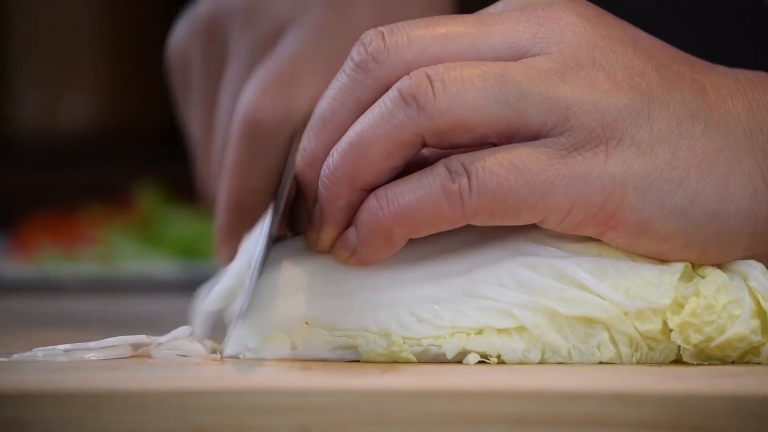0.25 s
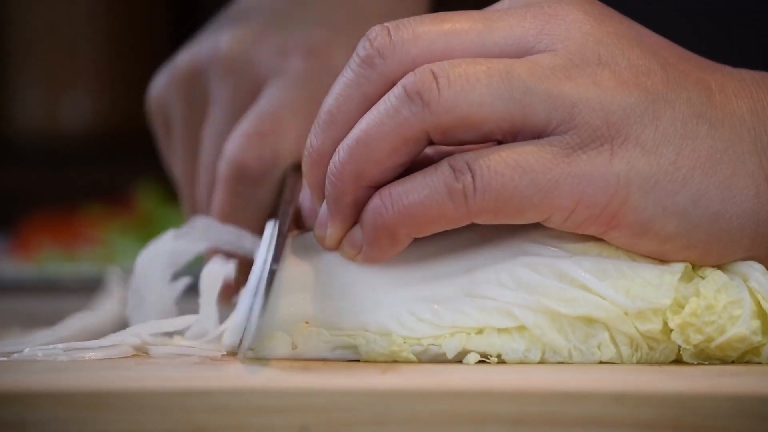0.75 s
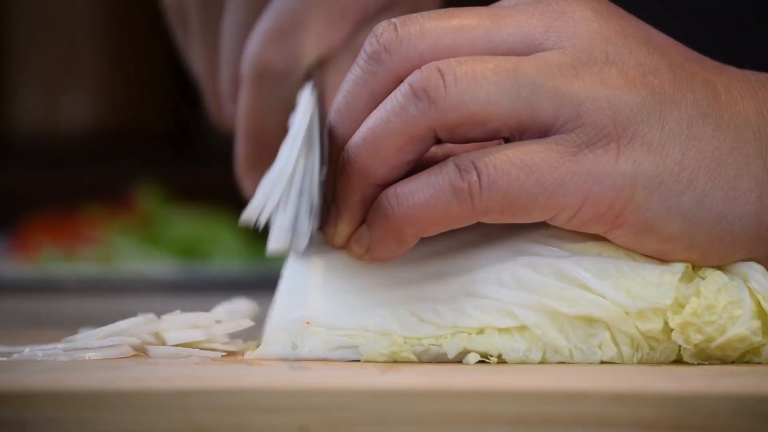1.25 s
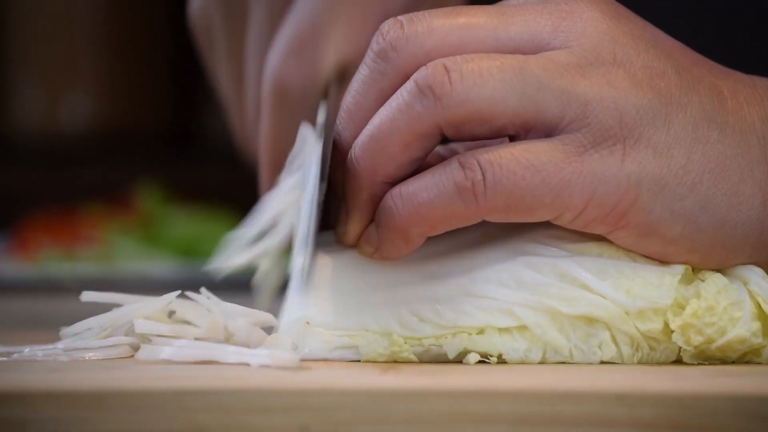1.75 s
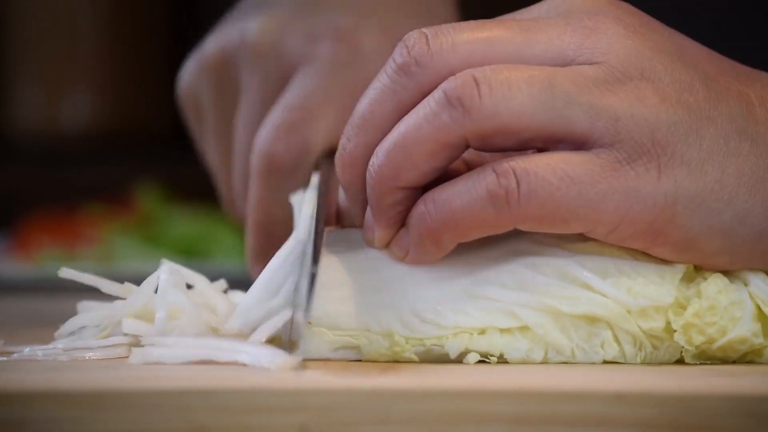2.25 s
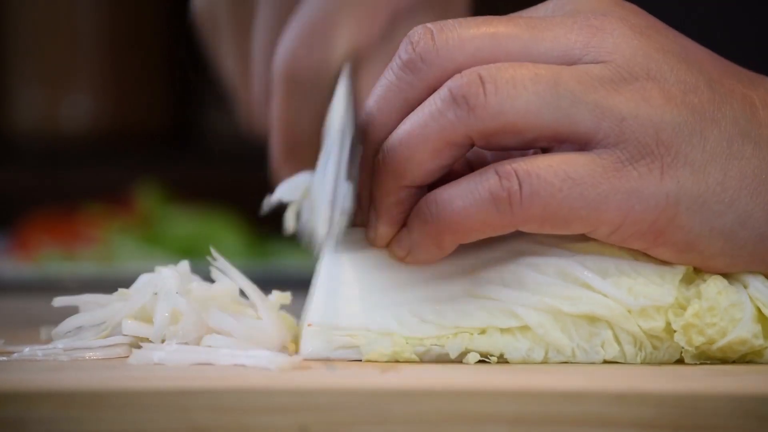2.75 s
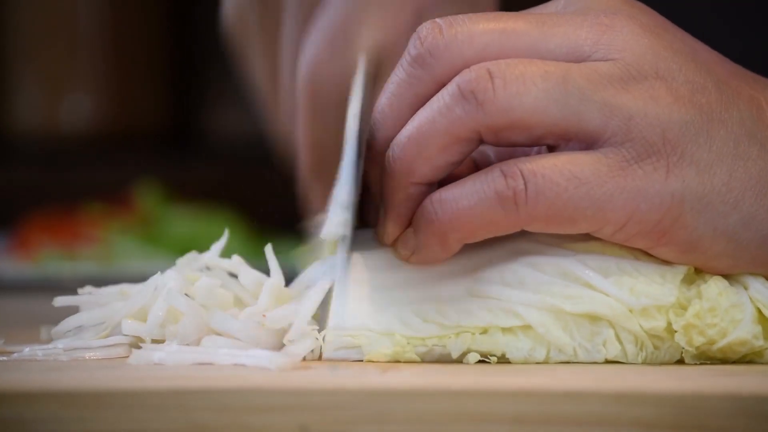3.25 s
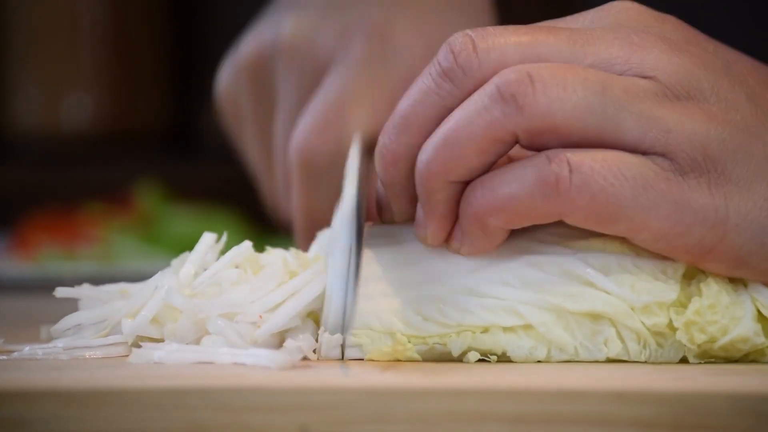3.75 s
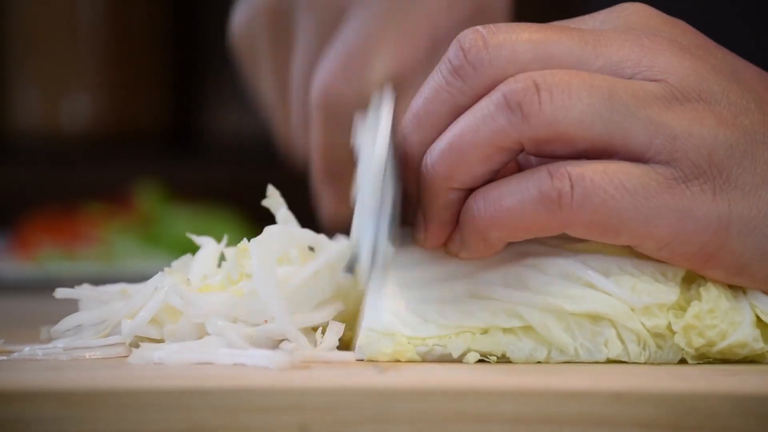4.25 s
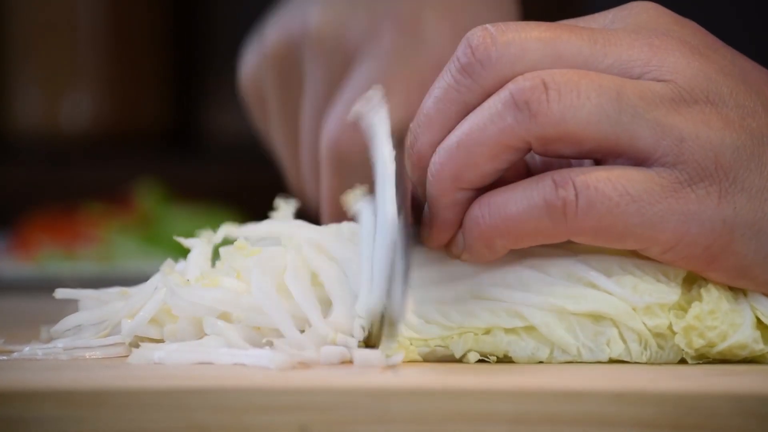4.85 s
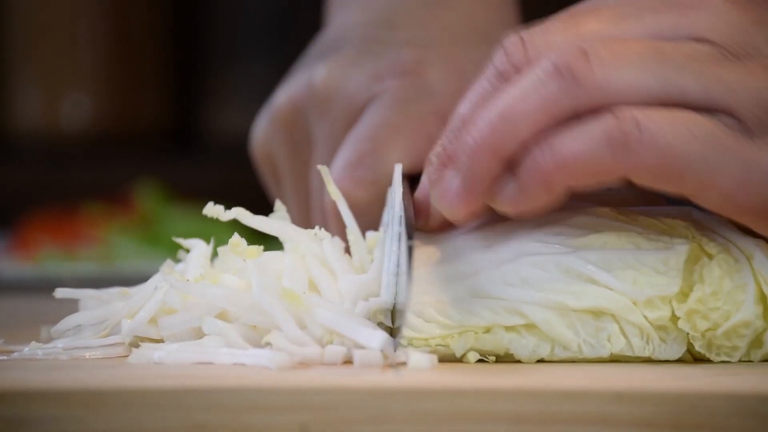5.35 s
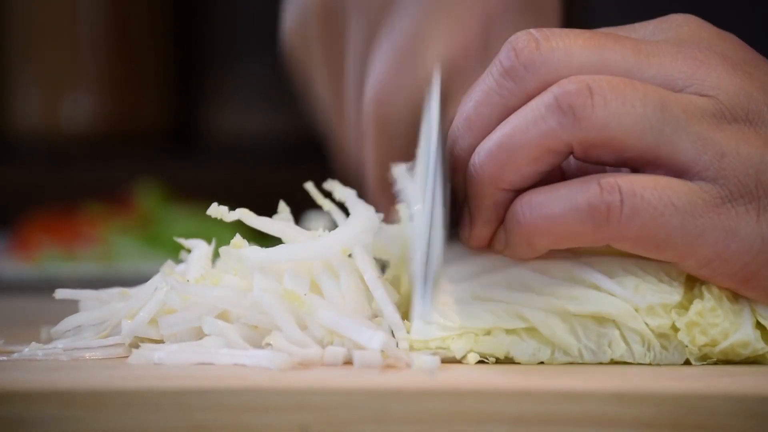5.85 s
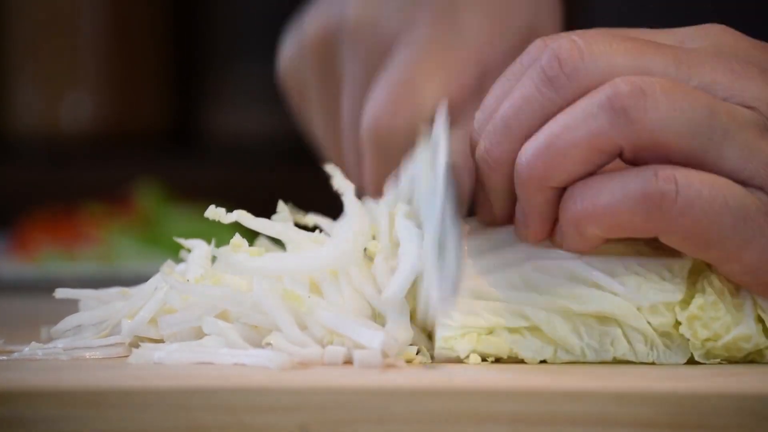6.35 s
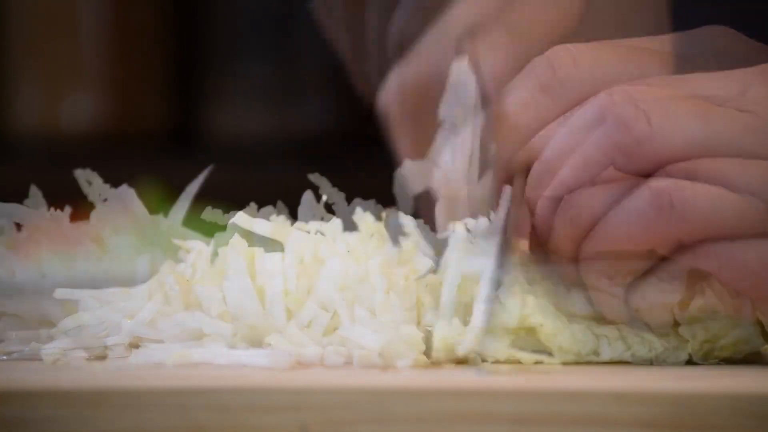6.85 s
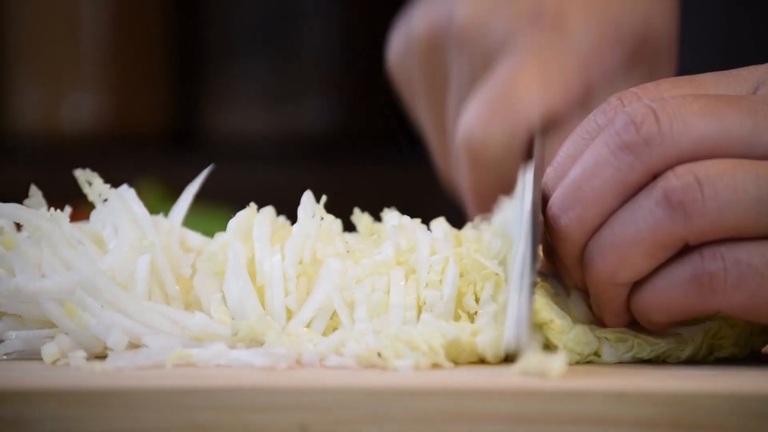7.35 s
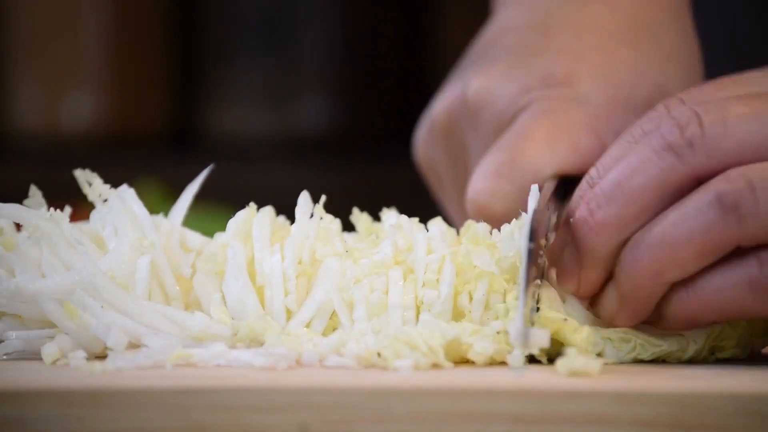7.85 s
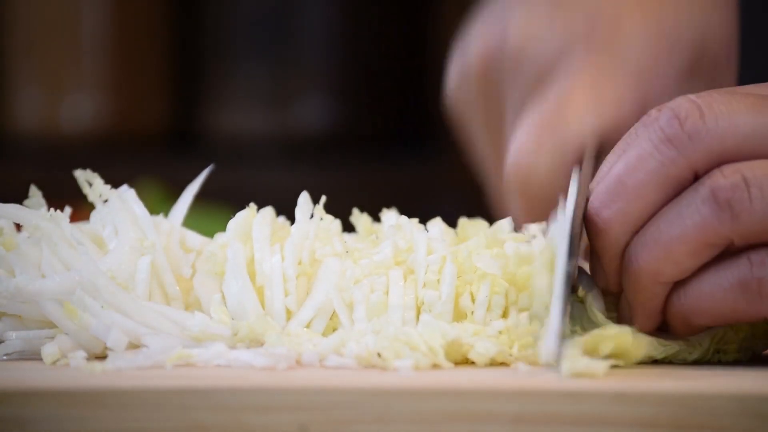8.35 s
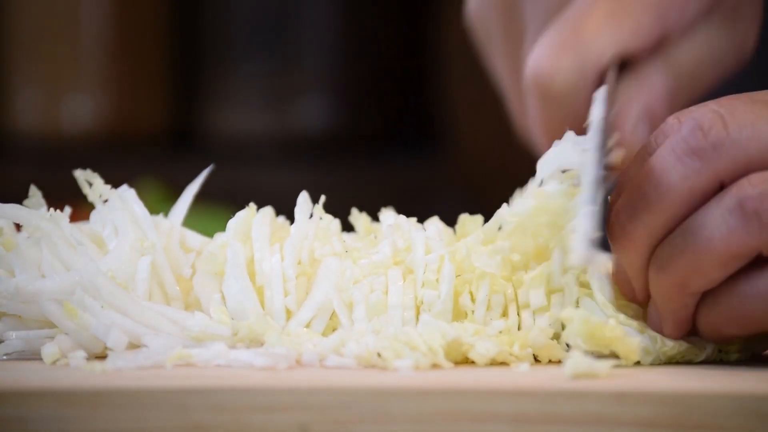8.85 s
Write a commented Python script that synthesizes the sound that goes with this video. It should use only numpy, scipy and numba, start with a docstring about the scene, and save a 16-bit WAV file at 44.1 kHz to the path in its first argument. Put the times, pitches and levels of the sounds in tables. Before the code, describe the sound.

A knife chops cabbage in a quiet kitchen, miked closely. Uneven blows give a short woody knock, a deep counter thump and a small edge crack. Leaves rasp and crunch around each stroke, ribs snap brightly and wet pockets pop. After a pause, a loud flat slap lands, then light cuts, a burst of crackles, and renewed chopping.

```python
"""A chef's knife shreds cabbage on a wooden board, close by, in a quiet kitchen.
Each blow rings decaying modes of the board and counter and cracks at the edge; once the blade slaps down flat.
Leaves crunch as dense random grains through resonances, ribs snap as noise clicks, wet pockets pop as glides.
Room noise and a faint tail lie beneath. One passage repeats, with a short fade-in where it starts over."""
import sys
import numpy as np
from scipy import signal
from scipy.fft import rfft, irfft
from scipy.io import wavfile
from scipy.ndimage import uniform_filter1d
from numba import njit

SR = 44100
rng = np.random.default_rng(int(sys.argv[2]) if len(sys.argv) > 2 else 0)


def dump_mix(stems):
    """Bounce the given channels to the path in sys.argv[1] as a 16-bit WAV at rate SR."""
    frames = np.atleast_2d(stems).T  # one column per channel
    limited = np.clip(frames, -1, 1)  # hard clip at full scale
    pcm = np.round(limited * 32767).astype(np.int16)
    wavfile.write(sys.argv[1], SR, pcm)


N = 401751

PERIOD = 262903  # samples in one passage
RESTART_S, FADE_S = 4.811, .04  # time at which the passage starts over, and the time scale of its fade-in

# Blade meets board. Each row: time in seconds, board peak in dB, counter thump peak in dB,
# edge crack peak in dB, crunch of the last leaves in dB (before CRACKLE_DB and the leaf levels).
BLOWS = [(0.14, -31.5, -19.5, -27, -63.5), (0.188, -21.5, -20, -31.5, -38.5),
         (0.361, -8, -17.5, -28, -54.5), (0.562, -10.5, -12.5, -16, -32.5),
         (0.726, -22, -19.5, -22.5, -38.5), (0.917, -13, -12, -22, -34), (1.083, -20, -15.5, -24.5, -43.5),
         (1.259, -29, -17, -29.5, -44.5), (1.318, -36.5, -21, -39, -55.5), (1.454, -7, -12, -18, -42.5),
         (1.634, -19, -13, -21.5, -37), (2.208, -13.5, -14, -28, -48), (2.409, -10.5, -16, -18, -37.5),
         (2.605, -14.5, -15, -21, -32.5), (2.805, -28, -22, -45.5, -61.5), (2.96, -18.5, -16, -22.5, -49),
         (3.047, -33, -25.5, -35, -58), (3.177, -10.5, -15, -17.5, -44.5), (3.913, -33, -22, -48, -60.5),
         (4.149, -47.5, -25.5, -46.5, -60), (4.245, -32.5, -28.5, -41.5, -61),
         (4.276, -29.5, -47, -37, -57), (5.021, -26, -20.5, -33.5, -48), (5.24, -16.5, -19, -26, -48),
         (5.706, -13.5, -13, -26.5, -35.5), (5.93, -20, -21, -29.5, -42)]
# The blade drags through leaves away from the board. Each row: middle in seconds, crackle in dB (before
# CRACKLE_DB and the leaf levels), rub in dB, length within 10 dB in seconds (its sign has no effect).
DRAGS = [(0.097, -52.5, -63, 0.2), (.314, -39.5, -46, .032), (0.486, -45.5, -57, -0.03),
         (.845, -38.5, -53, -0.0128), (1.025, -48.5, -60, .036), (1.189, -45, -54, -0.01),
         (1.371, -43.5, -52, .04), (1.441, -44, -48, .026), (1.552, -50.5, -56, 0.17),
         (1.755, -43, -51, 0.0934), (1.832, -42, -48.5, .042), (2.0, -51, -58, .05),
         (2.102, -48.5, -55, .04), (2.23, -48, -57, .025), (2.32, -49, -55, .04), (2.385, -46, -51, .022),
         (2.541, -46, -58, .025), (2.59, -37, -45, .02), (2.705, -53, -69, 0.23), (2.784, -40, -49, 0.0242),
         (2.873, -39, -48.5, -0.03), (3.095, -48, -54, .05), (3.165, -46, -50, .022),
         (3.795, -44.5, -53, 0.065), (3.942, -44, -49, .075), (4.013, -51, -65, 0.09),
         (4.526, -51, -64, -0.16), (4.567, -43, -48, 0.04), (4.615, -42, -52, 0.02), (4.795, -51, -61, .03),
         (4.87, -46, -54, 0.09), (5.244, -24, -37, -0.0022), (5.387, -49, -60, .045),
         (5.478, -51, -50, -0.04), (5.622, -52, -67, 0.12), (5.692, -35, -45, .024)]
# Wet pops. Each row: time in seconds, level in dB before the onset and decay.
WET_POPS = [(0.2045, -34.5), (0.3026, -21), (0.988, -34.5), (1.4331, -34), (1.6241, -31), (1.725, -34.5),
            (1.9, -37), (2.2, -31), (2.297, -34.5), (2.4787, -28.5), (2.6639, -36), (3.1537, -30.5),
            (4.0069, -32.5), (4.566, -30.5), (4.768, -35.5), (5.9215, -35)]
# The loudest leaf ribs break. Each row: time in seconds, peak in dB, centre in Hz.
RIB_SNAPS = [(0.0926, -30.5, 8400), (0.162, -31, 7500), (0.2057, -24.5, 4450), (0.3024, -21.5, 6120),
             (0.5266, -22, 6100), (0.7398, -12, 11000), (0.8307, -28.5, 5600), (0.9884, -28, 4700),
             (1.2459, -30, 9400), (1.4499, -30, 5500), (1.5758, -26.5, 4880), (1.6136, -31, 5800),
             (1.6255, -31, 5850), (1.7623, -27.5, 4590), (1.8383, -28.5, 5070), (2.022, -33, 7500),
             (2.047, -31, 8000), (2.3255, -31, 8000), (2.7845, -30, 5930), (2.8758, -31, 8040),
             (3.9735, -31, 5600), (3.984, -26, 10200), (4.0046, -23, 10200), (4.0076, -21, 9300),
             (4.4719, -28, 11400), (4.5409, -25, 9800), (4.5647, -27, 7240), (4.585, -16, 10970),
             (4.5958, -19, 8340), (4.6238, -23.5, 10300), (4.647, -24.5, 10150), (4.6972, -25, 11430),
             (4.736, -23, 10400), (4.7672, -17, 9570), (4.7726, -14, 10000), (4.7781, -14, 10200),
             (4.799, -19, 9700), (4.8052, -21, 9100), (5.036, -29.5, 6400), (5.2628, -23, 5800),
             (5.5223, -32, 8000), (5.527, -30, 9050), (5.549, -27.5, 10800), (5.6353, -29, 9800),
             (5.6974, -27, 9300)]
# The heap stirs between strokes. Each row: time in seconds, rub in dB, crackle in dB (before CRACKLE_DB
# and the leaf levels), counter wobble in dB; random drifts are added to all three.
STIRRING = [(0, -58, -59, -34.5), (1.3, -68.5, -61, -37), (1.92, -62.5, -57.5, -41.5),
            (2.4, -61, -55, -39.5), (3.1, -71, -63, -37), (3.3, -74, -68, -43.5), (3.62, -68, -57, -41.5),
            (3.85, -67, -56, -42.5), (4.35, -70, -59, -47.5), (4.6, -65, -53, -38),
            (5.1, -66, -54.5, -40.5), (5.96, -59.5, -56, -39.5)]
# Air gap beside the blade. Each row: time in seconds, resonance in Hz.
AIR_GAP = [(0, 1510), (1.7, 1600), (2.1, 2124), (3.2, 2210), (3.9, 2490), (4.8, 2630), (4.83, 1920),
           (5.6, 2020), (5.96, 1643)]
# Board modes. Each row: frequency in Hz, relative level in dB, 60 dB decay time in seconds.
BOARD_MODES = [(107.9, 2.5, 0.058), (152.5, -6.5, 0.0436), (210.9, -14.5, 0.316), (247.3, -5, 0.1554),
               (264.8, -7.5, 0.2155), (298.14, 1.5, 0.1295), (320.5, 1, 0.09), (394.4, -23.5, 0.105),
               (509, -13.5, 0.0546), (890, -12, 0.025), (1087, -20, 0.029)]
# Counter modes. Each row: frequency in Hz, relative level in dB, 60 dB decay time in seconds.
COUNTER_MODES = [(20, -4, 0.3), (29.29, 28.5, 0.1882), (62, -16.5, .13), (103.7, 3, 0.158)]
# Leaf resonances. Each row: centre in Hz, bandwidth in Hz, relative level in dB.
LEAF_MODES = [(4682, 1220, 1.5), (6263, 1445, -0.5), (7720, 1825, 4), (10130, 3030, 2.5), (13030, 4300, -4)]
# Modes of the flat blade. Each row: frequency in Hz, relative level in dB, 60 dB decay time in seconds.
BLADE_MODES = [(48, -15, 0.123), (113, -14.5, .06), (175, -18, 0.058), (720, -9.5, 0.0054),
               (1281, -7.5, 0.0155), (2605, -19, 0.0253), (3420, -13, 0.0155), (8930, 12.5, 0.004)]
# Direction in which each board mode first moves: one sign per mode, no unit.
BOARD_MODE_SIGNS = [-1, -1, 1, -1, 1, -1, -1, -1, -1, -1, -1]
# Spectrum of the room noise. Each row: frequency in Hz, relative level in dB per Hz.
ROOM_SPECTRUM = [(35, -39), (60, 8), (146, -20.5), (287, -21), (749, -18), (2900, -29), (14600, -27),
                 (16000, -36)]
# Character of the crackle. Each row: time in seconds, centre in Hz, small snaps per second.
CRACKLE_COURSE = [(0, 6500, 3), (2.3, 6200, 3), (2.6, 7500, 3), (3.25, 7200, 1), (3.8, 6400, 1),
                  (4.0, 9540, 2), (4.45, 10000, 6), (4.56, 10300, 50), (4.81, 10300, 50), (4.83, 7000, 2),
                  (5.25, 5200, 2), (5.45, 7800, 4), (5.7, 8350, 4), (5.96, 5500, 3)]

SLAP_S, SLAP_DB = 3.7112, -0.5  # time and peak of the flat slap
TOP_HZ = 16100
KITCHEN_DB = -57.5  # rms
TICK_DB = -8.5  # tick against the edge crack
CUT_LEAD_S, CUT_RISE_S, CUT_FALL_S = .002, .01, 0.0067  # last leaves peak before the blow; 10 dB rise and fall
CUT_RUB_DB = -8  # rub against the crackle level as the last leaves give
CUT_DARKER = 0.856  # centre of a crunch at the board against one in the heap
CRACKLE_DB = -9  # applied to the whole crackle
SMALL_SNAP_DB, SMALL_SCATTER_DB, SMALL_DETUNE = -35.5, 6, 0.216  # peak, its +/- range, +/- share of the centre
REBOUND_S, REBOUND_DB = .036, -14  # the board rocks back onto the counter
RASP_DB, RASP_SLOPE, RASP_T60_S = 5, 1.6, .06  # rasp level is RASP_DB + RASP_SLOPE times the pop level in dB
TILT_DB = 14  # per octave of leaf resonance, for a crackle one octave brighter


def undb(db):
    """Convert a level in decibels to the amplitude ratio it denotes."""
    return 10 ** (np.asarray(db) / 20)


def unit(x):
    """Normalise mean power: scale to rms 1."""
    return x / np.sqrt(np.mean(x ** 2))


def place(s):
    """Periodicity: the sample of the passage that sounds at time s."""
    return int((s - RESTART_S) * SR) % PERIOD


def curves(table):
    """Linear interpolation of a table's columns along the passage."""
    s, *columns = np.transpose(table)
    now = (np.arange(PERIOD) + int(RESTART_S * SR)) % PERIOD / SR
    return [np.interp(now, s, c) for c in columns]


def add(track, s, sound):
    """Superposition: mix a short sound in at time s."""
    i = place(s)
    track[i:i + len(sound)] += sound[:PERIOD - i]


@njit
def svf(x, hz, width):
    """Resonance: a state-variable band-pass with a moving centre, gain 1 there."""
    y, b, l = np.empty(len(x)), 0., 0.
    for i in range(len(x)):
        g, k = np.tan(np.pi * hz[i] / SR), width / hz[i]
        v = (b + g * (x[i] - l)) / (1 + g * (g + k))
        b, l, y[i] = 2 * v - b, l + 2 * g * v, k * v
    return y


def band(x, hz, width):
    """Resonance at a fixed or moving centre."""
    return svf(x, np.clip(hz + np.zeros(len(x)), 10, SR / 2.4), float(width))


def noise(t):
    """White noise: equal mean power at all frequencies, one value for each time in t."""
    return rng.standard_normal(len(t))


def walk(rate):
    """Random modulation: levels held about 1 / rate seconds and slewed, spread near 1."""
    k = int(SR / rate)
    levels = np.repeat(rng.standard_normal(PERIOD // k + 1), k)
    return uniform_filter1d(levels, k // 2)[:PERIOD]


def grains(count, rate, spread_db):
    """Random point process: tiny cells burst as clicks of uneven size; rms 1."""
    burst = rng.random(count) < rate / SR
    polarity = rng.standard_normal(count)
    size = undb(spread_db * np.minimum(rng.exponential(size=count), 4))
    return unit(burst * polarity * size)


def ring(modes, push_s, signs, scatter_db, detune):
    """Modal decay after a half-cycle push; every blow weights and tunes the modes anew; peak 1."""
    t = np.arange(SR // 3) / SR
    hz, db, t60 = np.transpose(modes)[:, :, None]
    chance = rng.standard_normal((2,) + db.shape)
    hz = hz * (1 + detune * chance[0])
    db = db + scatter_db * chance[1]
    decay = np.reshape(signs, (-1, 1)) * undb(db - 60 * t / t60)
    free = np.sum(decay * np.sin(2 * np.pi * hz * t), axis=0)
    push = np.hanning(int(push_s * SR) + 3)  # smooth raised-cosine pulse
    sound = signal.fftconvolve(free, push)[:len(t)]
    return sound / np.abs(sound).max()


def click(hz):
    """Impulsive excitation: a noise burst around its own centre also rings the leaves; peak 1."""
    t = np.arange(SR // 30) / SR
    burst = noise(t) * (undb(-60 * t / 0.0026) + undb(-17.5 - 60 * t / 0.0096))
    burst = band(burst, hz, 0.295 * hz)
    burst = burst + 4.6 * sum(band(burst, f, w) for f, w, _ in LEAF_MODES)
    return burst / np.abs(burst).max()


def kitchen():
    """Stationary noise: random spectrum shaped into the steady hiss and low rumble of the room."""
    hz = np.fft.rfftfreq(PERIOD, 1 / SR) + 1
    at, db = np.transpose(ROOM_SPECTRUM)
    shape = undb(np.interp(np.log(hz), np.log(at), db))
    return undb(KITCHEN_DB) * unit(irfft(rfft(rng.standard_normal(PERIOD)) * shape, PERIOD))


def tilt_db(hz, leaf_hz):
    """Spectral tilt: a brighter crackle raises the higher leaf resonances and lowers the others."""
    return TILT_DB * np.log2(hz / 6800) * np.log2(leaf_hz / 7000)


def crunches():
    """Gain swells, cuts at the board and drags: (s, crackle dB, rub dB, rise s, fall s, centre Hz)."""
    centre_hz = curves(CRACKLE_COURSE)[0]
    swells = []
    for s, *_, db in BLOWS:
        hz = CUT_DARKER * centre_hz[place(s)]
        swells.append((s - CUT_LEAD_S, db, db + CUT_RUB_DB, CUT_RISE_S, CUT_FALL_S, hz))
    for s, db, rub_db, length in DRAGS:
        swells.append((s, db, rub_db, length / 2, length / 2, centre_hz[place(s)]))
    return swells


def friction_gains():
    """Intermittent sliding: gains of the rub and of each leaf resonance, in fits and crunch swells."""
    rub_db, crackle_db, _ = curves(STIRRING)
    leaf_hz, _, leaf_db = np.transpose(LEAF_MODES)
    # shreds slide in short random fits; the rub and each leaf resonance also flicker on their own
    fits = np.tanh(walk(45) / 1.4) * 1.516
    rub_gain = undb(rub_db + 0.95 * fits + 3.6 * walk(25))
    leaf_gain = np.array([undb(crackle_db + db + 5.6 * fits + 2.8 * walk(40)) for db in leaf_db])
    leaf_gain = leaf_gain * undb(tilt_db(curves(CRACKLE_COURSE)[0], leaf_hz[:, None]))
    t = np.arange(-SR // 8, SR // 8) / SR
    for s, db, low_db, rise_s, fall_s, hz in crunches():
        swell = undb(-10 * np.abs(t / np.where(t < 0, rise_s, fall_s)) ** 2.85)
        add(rub_gain, s + t[0], undb(low_db) * swell)
        for gain, mode_db in zip(leaf_gain, leaf_db + tilt_db(hz, leaf_hz)):
            add(gain, s + t[0], undb(db + mode_db) * swell)
    return rub_gain, leaf_gain


def lean(cells):
    """Forced vibration: hands leaning on the board rock the counter."""
    wobble_db = curves(STIRRING)[2]
    push = rng.standard_normal(PERIOD)
    wobble = unit(band(band(push, 22.06, 22.6), 22.6, 50.0))
    wobble = wobble + undb(-17.5) * unit(band(cells, 281.7, 95))
    wobble = wobble + undb(-16.5) * unit(band(band(push, 75.4, 64), 97, 130))
    return undb(wobble_db + 3.6 * walk(12)) * wobble


def rub(cells, gap_hz):
    """Friction excites resonators: dense grains ring the air gap and the board."""
    squeak = band(band(cells, gap_hz, 536), gap_hz * (1 + 0.088 * walk(40)), 240)
    sound = unit(squeak + undb(-11) * band(band(cells, 920, 1410), 974, 1760))
    sound = sound + undb(-10.0) * unit(band(cells, 338.6, 69))
    return sound + undb(-6.0) * unit(band(cells, 418, 251))


def crackle(leaf_gain):
    """Fracture noise: grains of bursting cells filtered by the leaf resonances."""
    fizz = grains(PERIOD, 1400, 3.6) + 0.468 * rng.standard_normal(PERIOD)
    drift = 1 + 0.0955 * walk(25)  # the leaf resonances wander a little at random, all together
    out = np.zeros(PERIOD)
    for gain, (hz, width, _) in zip(leaf_gain, LEAF_MODES):
        out += gain * unit(band(band(fizz, hz, 2 * width), hz * drift, width))
    return undb(CRACKLE_DB) * out


def leaves(gap_hz):
    """Superposition of friction sounds: low rub, brighter crackle and the wobble of the counter."""
    rub_gain, leaf_gain = friction_gains()
    cells = grains(PERIOD, 1100, 3.8) + 0.55 * rng.standard_normal(PERIOD)
    return rub_gain * rub(cells, gap_hz) + crackle(leaf_gain) + lean(cells)


def snaps():
    """Brittle fracture: ribs break with a click each, smaller ones at random at the tabled rate."""
    out = np.zeros(PERIOD)
    for s, db, hz in RIB_SNAPS:
        add(out, s - .0002, undb(db) * click(hz))
    centre_hz, rate = curves(CRACKLE_COURSE)
    for at, luck, size, pitch in rng.random((360, 4)):  # about 60 chances a second
        i = int(at * PERIOD)
        sound = click(centre_hz[i] * (1 + SMALL_DETUNE * (2 * pitch - 1)))
        gain = undb(SMALL_SNAP_DB + SMALL_SCATTER_DB * (2 * size - 1))
        add(out, RESTART_S + i / SR, (luck < rate[i] / 60) * gain * sound)
    return out


def pops(gap_hz):
    """Cavity resonance: a wet pocket opens beside the blade and glides up to near the gap's pitch."""
    out, t = np.zeros(PERIOD), np.arange(SR // 25) / SR
    for s, db in WET_POPS:
        hz = gap_hz[place(s)] * (1.05 - 0.27 * np.exp(-t / 0.001124))
        envelope = undb(db - 60 * t / 0.0151) * (1 - np.exp(-t / 0.000213))
        add(out, s, envelope * np.sin(2 * np.pi * np.cumsum(hz) / SR))
        # a gritty tear starts with the pop and outlasts it; its level rises faster with stronger pops
        rasp = unit(band(band(noise(t), .92 * hz[-1], 1400), .9 * hz[-1], 1200))
        add(out, s, undb(RASP_DB + RASP_SLOPE * db - 60 * t / RASP_T60_S) * rasp)
    return out


def slap():
    """Broad impact: the flat blade rings its modes under a short noise burst."""
    out, t = np.zeros(PERIOD), np.arange(SR // 20) / SR
    add(out, SLAP_S, undb(SLAP_DB) * ring(BLADE_MODES, .0001, 1, 0, 0))
    burst = unit(band(noise(t), 3250, 5600))
    add(out, SLAP_S, undb(SLAP_DB - 17.0 - 60 * t / 0.0152) * burst)
    return out


def counter_thump(out, s, db):
    """Modal response of a heavy body: the counter answers late and low."""
    thump = ring(COUNTER_MODES, .002, [1, 1, -1, 1], 1.5, .05)
    add(out, s + 0.005874, undb(db) * thump)


def edge_knock(out, s, db):
    """Impulsive contact: the edge bites the wood with a short dense crack and a tick."""
    t = np.arange(SR // 5) / SR
    crack = band(band(noise(t) * undb(-60 * t / 0.0144), 620, 885), 688, 1204)
    add(out, s, undb(db) * crack / np.abs(crack).max())
    add(out, s + 0.001001, undb(db + TICK_DB) * click(4810))


def board_knock(out, s, db):
    """Modal response to contact time: a weaker blow is a longer, softer push on the board."""
    push_s = 0.001102 * undb(-.3 * (db + 7.5))
    add(out, s, undb(db) * ring(BOARD_MODES, push_s, BOARD_MODE_SIGNS, 1.94, 0.00585))
    rebound = ring(BOARD_MODES, .0012, BOARD_MODE_SIGNS, 3.0, .02)
    add(out, s + REBOUND_S, undb(db + REBOUND_DB) * rebound)
    # the board rattles on its seat while it rings
    t = np.arange(SR // 5) / SR
    add(out, s, undb(db - 23 - 60 * t / 0.1107) * unit(band(noise(t), 398, 257)))


def chops():
    """Coupled impact: each blow sounds the counter, the blade edge and the board."""
    out = np.zeros(PERIOD)
    for s, board_db, thump_db, edge_db, _ in BLOWS:
        counter_thump(out, s, thump_db)
        edge_knock(out, s, edge_db)
        board_knock(out, s, board_db)
    return out


def scene():
    """Superposition and reverberation: one passage with a faint room tail, faded in and repeated."""
    gap_hz, = curves(AIR_GAP)
    near = leaves(gap_hz) + snaps() + pops(gap_hz) + slap() + chops()
    t = np.arange(SR // 3) / SR
    room = band(noise(t), 1330, 4660) * undb(-60 * t / 0.51) * (t > .003)
    tail = undb(-50.5) * signal.fftconvolve(near, room)[:PERIOD]
    passage = near + tail + kitchen()
    passage = passage * np.clip(0.099 + np.arange(PERIOD) / SR / FADE_S, 0, 1)
    return passage[(np.arange(N) + place(0)) % PERIOD][None]


def record(dry):
    """Band limitation: the microphone drops the slowest sway; the recorder cuts the top."""
    dry = signal.sosfilt(signal.butter(1, 6, "high", fs=SR, output="sos"), dry)
    return signal.sosfilt(signal.ellip(8, .2, 70, TOP_HZ, fs=SR, output="sos"), dry)


dry = scene()
out = record(dry)
dump_mix(out)
```